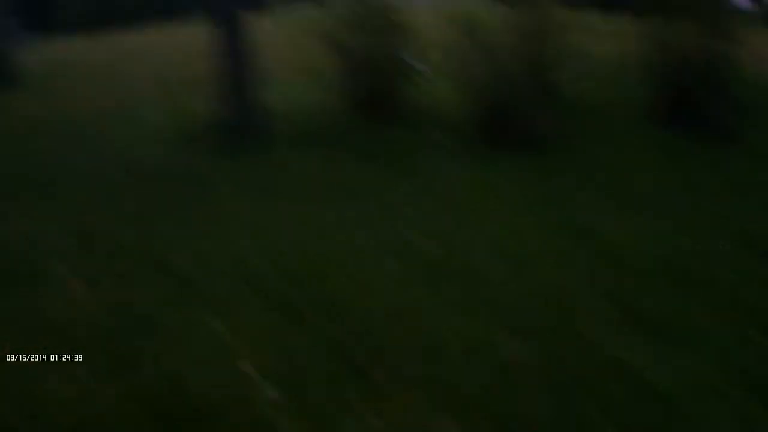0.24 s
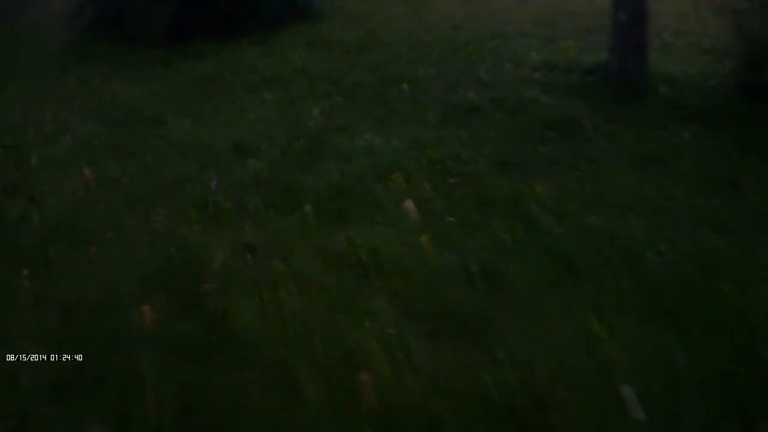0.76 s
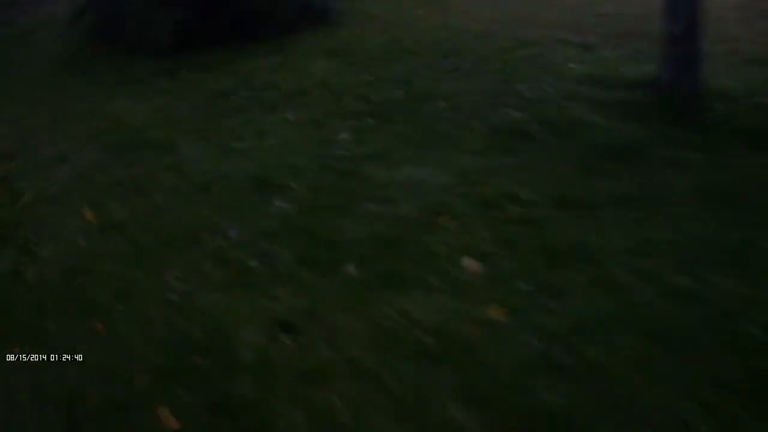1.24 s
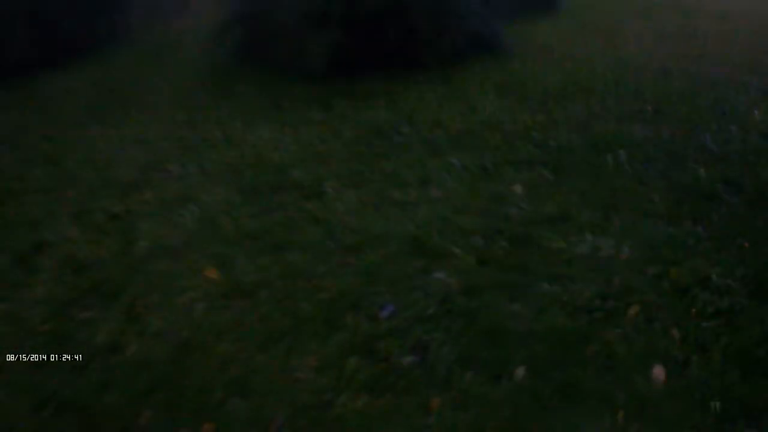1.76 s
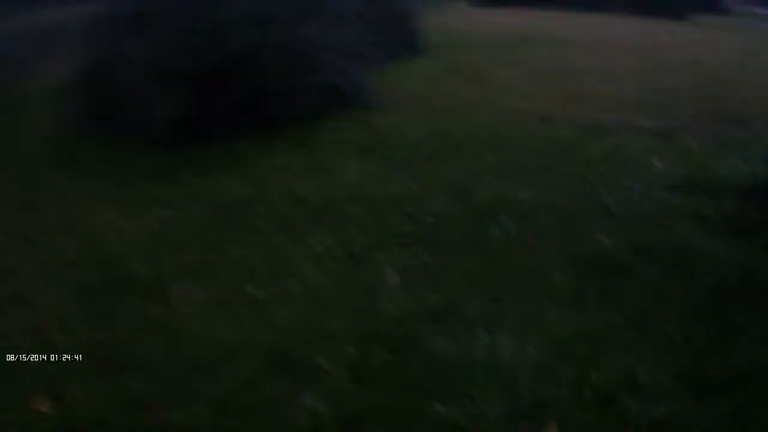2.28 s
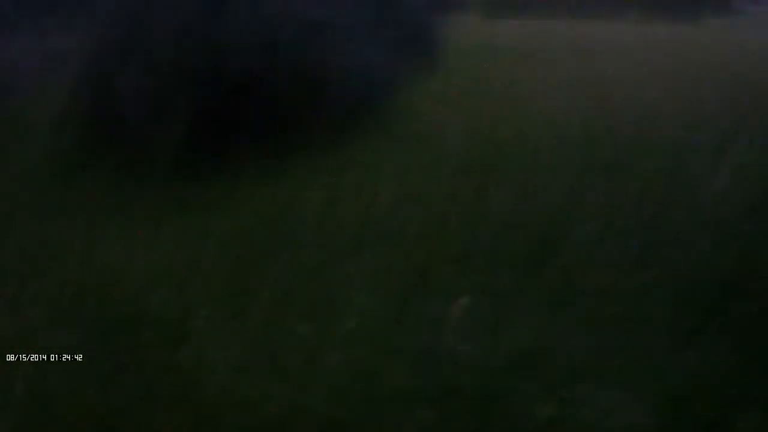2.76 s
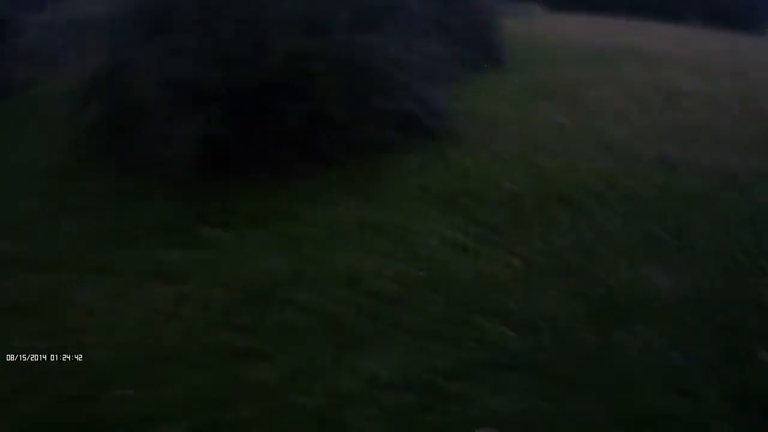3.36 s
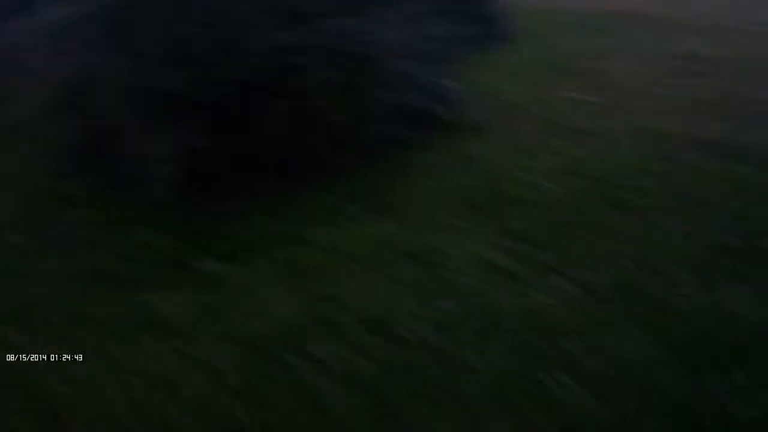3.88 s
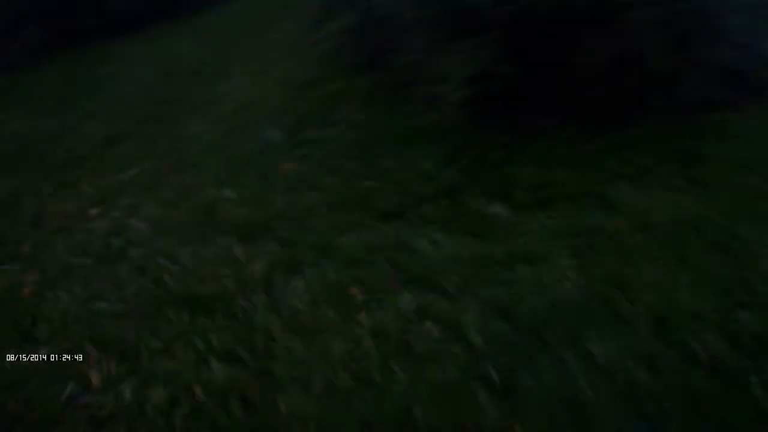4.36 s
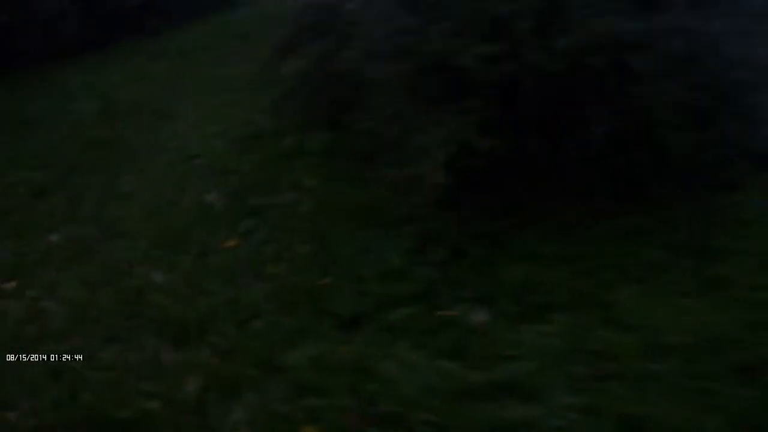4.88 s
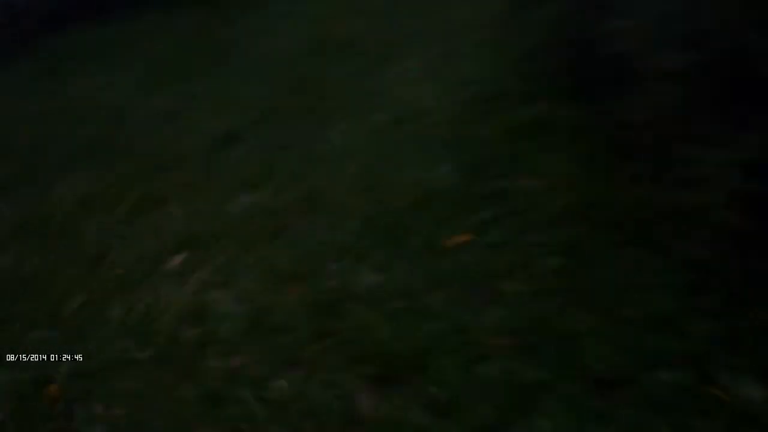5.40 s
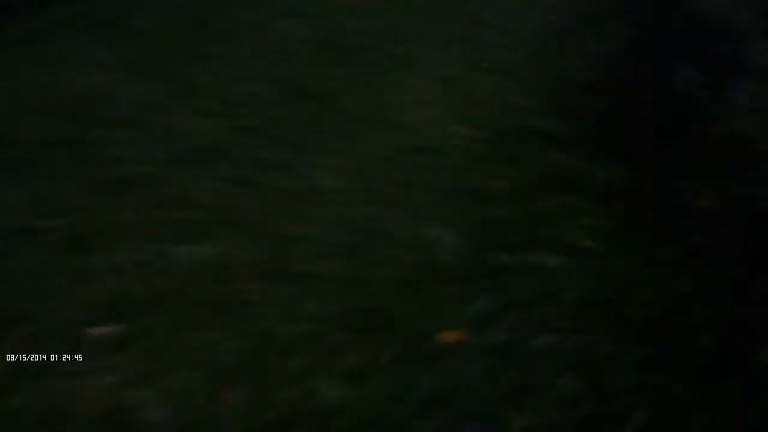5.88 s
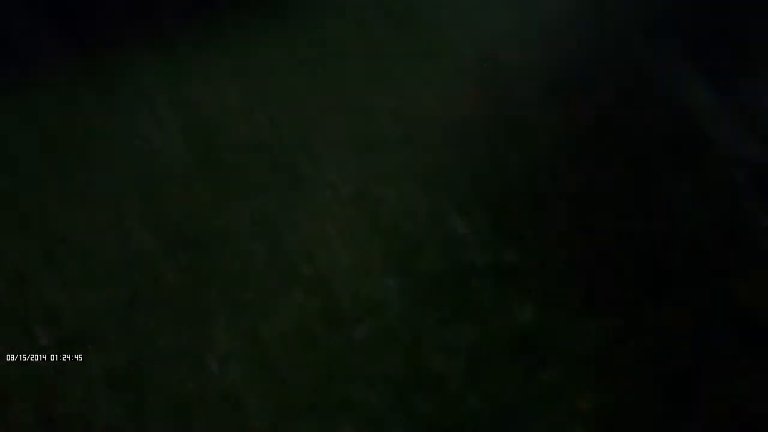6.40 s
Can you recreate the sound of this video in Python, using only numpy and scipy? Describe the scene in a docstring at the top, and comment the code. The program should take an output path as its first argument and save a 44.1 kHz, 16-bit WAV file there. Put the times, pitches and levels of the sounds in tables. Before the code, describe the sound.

Loud, irregular plastic clicks and hollow knocks over dull, regular footfall thumps and faint grassy rustle, heard from inside a closed camera housing.

```python
"""On wet grass, someone walks with a small camera in a closed plastic housing.
Each stride shakes the housing: shaped noise makes low thumps, a slow sway and a muffled rustle.
Loose parts knock and click against it; each blow rings a bank of decaying sine modes.
The housing adds its hollow resonance to the knocks, and a soft microphone hiss lies under everything."""
import sys
import numpy as np
from scipy import signal
from scipy.fft import rfft, irfft
from scipy.io import wavfile
from scipy.ndimage import uniform_filter1d

SR = 44100
rng = np.random.default_rng(int(sys.argv[2]) if len(sys.argv) > 2 else 0)


def generate_wav(sig):
    """Save sig (samples, or channels by samples) to the path in sys.argv[1] as 16-bit PCM at SR."""
    pcm = np.round(np.clip(np.atleast_2d(sig).T, -1, 1) * 32767).astype(np.int16)
    wavfile.write(sys.argv[1], SR, pcm)


N = 292824  # length in samples


def gain_of(db):
    """Turns dB into an amplitude gain."""
    return 10 ** (np.asarray(db) / 20)


def evened(x):
    """Scales to rms 1."""
    return x / np.sqrt(np.mean(x ** 2) + 1e-20)


def add(mix, s, sound):
    """Mixes a sound in at time s, in seconds, cutting it at the end of the mix."""
    part = mix[round(s * SR):][:len(sound)]
    part += sound[:len(part)]


def coloured(x, spectrum):
    """Filters x to the spectrum in minimum phase (sharp attack, ringing after), at rms 1."""
    hz = np.fft.rfftfreq(N, 1 / SR)
    table_hz, table_db = np.transpose(spectrum)
    db = np.interp(np.log(hz + 1), np.log(table_hz + 1), table_db, -90, -90)
    cepstrum = irfft(np.log(gain_of(db)), N)
    # folding the cepstrum onto positive times makes the filter causal
    fold = np.r_[1, 2 * np.ones(N // 2 - 1), 1, np.zeros(N - N // 2 - 1)]
    response = np.exp(rfft(cepstrum * fold))
    return evened(irfft(rfft(x) * response, N))


def steadied(x, span_s, share):
    """Evens out part of the level swings of x that are slower than span_s, at rms 1."""
    span = round(span_s * SR)
    power = uniform_filter1d(uniform_filter1d(x ** 2, span), span)
    return evened(x / (abs(power) + 1e-6) ** (share / 2))


def flutter(per_s, depth_db):
    """A gain that wanders between random levels, per_s of them a second."""
    knots = rng.standard_normal(1400)
    position = np.arange(N) / SR * per_s
    return gain_of(depth_db * np.interp(position, np.arange(len(knots)), knots))


def grains(per_s, spread_db):
    """Sparse impulses of random sign, a few of them large."""
    when = rng.random(N)
    size = rng.exponential(1, N)
    sign = rng.choice([-1., 1.], N)
    return (when < per_s / SR) * sign * gain_of(spread_db * np.minimum(size, 4))


def shaking(blows, shape, dip_db=0):
    """Gain per sample: each blow (s, length s, first dB, last dB) rises, holds and falls over a quiet level."""
    rise_db, fall_db, rest_db = shape
    t = np.arange(0, N, 32) / SR  # one point every 32 samples is enough
    s, length, first_db, last_db = np.transpose(blows)[:, :, None]
    along = np.clip((t - s) / np.maximum(length, 1e-3), 0, 1)
    dip = dip_db * np.sin(np.pi * along) * (length > 0)
    held_db = first_db + (last_db - first_db) * along - dip
    before_s = np.maximum(s - t, 0)
    after_s = np.maximum(t - s - length, 0)
    db = held_db - abs(rise_db) * before_s - abs(fall_db) * after_s
    power = (gain_of(db) ** 2).sum(0) + gain_of(rest_db) ** 2
    return np.interp(np.arange(N) / SR, t, np.sqrt(power))


# Footfalls, heel to toe. Each row: heel in seconds, roll length in seconds, heel thump in dB,
# toe thump in dB, sway at the toe in dB, rustle in dB before the rustle's make-up gain.
FOOTFALLS = [(0.248, 0.084, -36.5, -40, -37, -65), (0.863, 0.064, -28.5, -38, -31.5, -63),
             (1.481, 0.1, -35, -36.5, -35, -65), (2.087, .12, -36.5, -36.5, -28, -62),
             (2.685, 0.093, -37, -33.5, -33.5, -63), (3.237, 0.17, -32.5, -43.5, -33, -63.5),
             (3.905, 0.12, -34.5, -39, -36, -66), (4.528, 0.11, -38, -38, -33.5, -66.5),
             (5.182, .12, -33, -37.5, -32, -62.5), (5.785, 0.064, -28.5, -29, -32.5, -60),
             (6.339, 0.071, -34, -37.5, -30.5, -66.5)]
# Other jolts around the footfalls, with a dragging rustle near 5.4 s. Each row: time in seconds,
# thump in dB, sway in dB, rustle in dB before the rustle's make-up gain.
JOLTS = [(.05, -50, -54, -70.5), (.2, -50, -42, -71), (.46, -47.5, -48, -74), (.67, -50, -32, -64.5),
         (.78, -41.5, -40, -69), (1.109, -47.5, -56, -72.5), (1.29, -44.5, -39, -67.5),
         (1.42, -42.5, -49, -77), (1.67, -46, -45, -71.5), (1.94, -48, -33, -67.5),
         (2.25, -40, -41.5, -66.5), (2.519, -55, -48, -70.5), (2.94, -47, -54, -70.5),
         (3.11, -46, -37, -68), (3.511, -41, -46.5, -74), (3.71, -52, -42.5, -75), (4.1, -53.5, -52, -68.5),
         (4.329, -48, -42.5, -69), (4.44, -42.5, -43, -70), (4.841, -42.5, -40.5, -73),
         (4.98, -44.5, -42, -67), (5.36, -40.5, -43, -61.5), (5.43, -55, -59, -66), (5.5, -58.5, -55, -65),
         (5.592, -37.5, -28, -63.5), (5.68, -52, -47.5, -71), (5.93, -62, -37.5, -69),
         (6.14, -37.5, -34.5, -63), (6.521, -45.5, -49.5, -68)]
# How each layer follows a blow. Each holds: rise in dB per s, fall in dB per s, level between blows in dB
# (the rustle's again before its make-up gain).
THUMP_SHAPE = (350, 240, -55.5)
SWAY_SHAPE = (370, 1000, -54)
RUSTLE_SHAPE = (200, 180, -76)
SWAY_GROWS_DB = 5.5  # the sway builds from heel to toe
ROLL_DIP_DB = 1.5  # the thump sags between heel and toe


def stride():
    """Each footfall rolls from heel to toe and each jolt has no roll; both drive thump, sway and rustle gains."""
    thump, sway, rub = [], [], []
    for s, roll, heel_db, toe_db, sway_db, rustle_db in FOOTFALLS:
        thump.append((s, roll, heel_db, toe_db))
        sway.append((s, roll, sway_db - SWAY_GROWS_DB, sway_db))
        rub.append((s, roll, rustle_db, rustle_db))
    for s, thump_db, sway_db, rustle_db in JOLTS:
        thump.append((s, 0, thump_db, thump_db))
        sway.append((s, 0, sway_db, sway_db))
        rub.append((s, 0, rustle_db, rustle_db))
    thump_gain = shaking(thump, THUMP_SHAPE, ROLL_DIP_DB)
    return thump_gain, shaking(sway, SWAY_SHAPE), shaking(rub, RUSTLE_SHAPE)


# Tone of the microphone hiss. Each row: frequency in Hz, relative density in dB per Hz.
HISS = [(470, -38), (800, -11), (1090, -6.5), (1220, -6.5), (1350, -10), (1730, -17), (2710, -16.5),
        (5940, -18), (14400, -19), (15700, -27)]
HISS_DB = -73  # rms of the hiss before it stirs and flutters


def hiss(rustle_gain):
    """Microphone hiss: coloured noise that flutters at random and rises slightly with the rustle."""
    stir = (rustle_gain / gain_of(-73.5)) ** .09
    level = stir * flutter(45, depth_db=1.4)
    return gain_of(HISS_DB) * level * coloured(rng.standard_normal(N), HISS)


# Muffled tone of the rustle. Each row: frequency in Hz, relative density in dB per Hz.
RUSTLE = [(150, -40.5), (250, -7), (317, -6), (360, -14.5), (413, -12.5), (632, -11), (782, -15.5),
          (1210, -9.5), (1700, -26.5), (2810, -26.5), (3110, -33), (5000, -37.5), (6500, -69.5),
          (11000, -120)]


def rustle(rustle_gain):
    """Grass and clothing through the closed housing: short scuffs and fine crackle over a soft rub of noise."""
    puff = np.exp(-np.arange(800) / SR / .004)  # dies away with a 4 ms time constant
    scuffs = signal.oaconvolve(abs(grains(45, spread_db=3.)), puff)[:N]
    crackle = grains(900, spread_db=2.5) * 2.2
    rub = rng.standard_normal(N) * (.6 + scuffs)
    return gain_of(5.0) * rustle_gain * coloured(crackle + rub, RUSTLE)  # 5 dB make-up gain


# Tone of the thump at the mount's low resonance. Each row: frequency in Hz, relative density in dB per Hz.
THUMP = [(29, -31), (50, -1), (60, 0.5), (86, 3), (97, 2.5), (129, -7), (159, -13.5), (199, -18.5),
         (266, -32), (322, -24), (360, -40), (400, -35.5), (520, -62.5), (880, -120)]
# Tone of the slower camera sway. Each row: frequency in Hz, relative density in dB per Hz.
SWAY = [(8, -14.5), (18, -2), (28, -6), (45, -5), (62, -25.5), (90, -63.5)]


def thumps(thump_gain, sway_gain):
    """Jolts travel up the body and shake the mount near its low resonance; below it the camera sways."""
    shakes = grains(90, spread_db=5.0) + 0.013 * rng.standard_normal(N)
    thump = steadied(coloured(shakes, THUMP), span_s=.03, share=.7)
    sway = steadied(coloured(shakes, SWAY), span_s=.05, share=.7)
    return thump_gain * thump + sway_gain * sway


def ring(modes, weight_db, chatter_ms, push_db):
    """One blow: a briefly chattering contact rings the modes to peak 1, then a push of the housing is added."""
    hz, db, t60 = np.transpose(modes)[:, :, None]
    t = np.arange(2000) / SR
    sign = np.cos(np.pi * np.arange(len(hz)))[:, None]  # neighbouring modes move the microphone oppositely
    level = sign * gain_of(db + weight_db(hz) - 60 * t / t60)
    body = (level * np.sin(2 * np.pi * hz * t)).sum(0)
    fading = np.exp(-(t[:600] * 1000 / max(chatter_ms, .05)) ** 2)
    chatter = gain_of(-27) * rng.standard_normal(600) * fading
    contact = np.r_[1, chatter[1:]]  # the first hit, then the chatter
    build_up = 1 - np.exp(-(t / .0006) ** 2)  # the force builds up smoothly
    blow = np.convolve(contact, body)[:len(t)] * build_up
    u = t / .0004
    push = u ** 2 * (3 - u) * np.exp(-u)  # out and back
    return blow / abs(blow).max() + gain_of(push_db) * push


# A blunter part knocking on the housing wall. Each row: start in seconds, peak of the wall ring in dB,
# corner frequency in Hz, fall below it in dB per octave (negative: rises), fall above it in dB per octave,
# hollow ring in dB relative to that peak.
KNOCKS = [(.078, -45.5, 2420, -0.5, 9.8, -9), (.232, -52, 710, 4, 7.9, -6), (.257, -42.5, 1200, -5, 11, -2),
          (.513, -46.5, 1830, 30, 39, -11), (.854, -36.5, 1570, 5, 20, -9), (.871, -45, 2720, 4.5, 6, -25),
          (.892, -42.5, 2700, 3.5, 8, -24.5), (0.896, -35.5, 2280, 1, 1.9, -26),
          (.903, -42, 2093, 2.5, 8, -24), (1.266, -40, 1040, 21, 36, -18), (1.344, -50.5, 860, 10, 11, -6),
          (1.426, -35.5, 1220, 15, 15, -11), (1.472, -51.5, 2200, -3, 4.5, -17),
          (1.504, -46.5, 2486, 16, 21, -18), (1.5594, -13, 2410, -3, 2.6, -25.5),
          (1.66, -45.5, 1454, -3.5, 7.6, -19), (2.045, -15, 1213, 13, 6.4, -27.5),
          (2.277, -38, 4050, 43.5, 37, -27), (2.279, -43, 707, 4.5, 20, -25),
          (2.6644, -9.5, 2650, 2.5, 8, -30.5), (2.763, -25, 915, 21, 19, -5.5),
          (3.218, -24.5, 1370, 5.5, 12, -27.5), (3.232, -32, 920, 25, 17, -30),
          (3.299, -31, 923, 16.5, 16.4, -13), (3.565, -50, 2540, 0, 3.7, -30),
          (3.68, -40, 1300, 5, 15.6, -21), (3.853, -39.5, 1130, 13.5, 27, -12.5),
          (3.909, -46.5, 900, 1.5, 7.9, -12.5), (3.924, -40.5, 1190, 18, 25, -8),
          (3.967, -28, 1144, 5, 25.6, -4), (4.099, -56.5, 794, 3, 8.7, 1.5), (4.165, -51, 700, 3, 15, -1),
          (4.201, -48, 704, 0, 12, -3.5), (4.266, -51.5, 713, -6, 11, -0.5),
          (4.403, -51, 2840, 12.5, 12, -30), (4.412, -38.5, 1100, 18, 22, -14),
          (4.608, -27.5, 1220, 11, 19, -12), (5.049, -47, 806, 8, 14, -7), (5.164, -49.5, 1200, 0, 16, -19),
          (5.338, -44.5, 1200, -2, 15, -7), (5.459, -48, 1100, 1.5, 8.5, -30),
          (5.528, -48.5, 900, 4, 15, -22), (5.619, -46.5, 950, 3, 18, -25), (5.642, -45, 906, 3.5, 23, -5),
          (5.721, -47, 800, 4.5, 11, -12), (5.765, -33.5, 1353, 10, 20, -12),
          (6.128, -49, 900, -8, 15, -8.5), (6.2072, -34.5, 1850, 35.5, 6, -30.5),
          (6.432, -44.5, 708, 4, 12, -9.5), (6.515, -41, 998, -1, 12.5, -7.5)]
# Wall modes that a knock rings. Each row: frequency in Hz, level in dB before weighting, t60 in seconds.
KNOCK_MODES = [(722, -4, .032), (980, -8, .010), (1230, -4, .018), (1550, -5, .011), (1850, -6, .021),
               (2120, -6, .018), (2415, -4, .022), (2700, -3, .019), (3050, -6, .014), (3440, -7, .015),
               (3750, -7, .016), (4150, -11, .016), (4590, -11, .011), (5040, -14, .012), (5800, -20, .008),
               (6780, -16, .014), (8450, -24, .009)]
# Lowest ring of the housing. It holds: frequency in Hz, t60 in seconds.
HOLLOW = (323, .105)


def knocks():
    """Blunt contacts ring the wall modes, tilted about a corner frequency, and the hollow of the housing."""
    out = np.zeros(N)
    t = np.arange(8000) / SR
    hollow_hz, hollow_t60 = HOLLOW
    swell = 1 - np.exp(-(t / 0.0018) ** 2)
    hollow = gain_of(-60 * t / hollow_t60) * np.sin(2 * np.pi * hollow_hz * t) * swell
    for s, peak_db, corner_hz, below_db, above_db, hollow_db in KNOCKS:
        def weight_db(hz):
            """Tilts the modes separately below and above the corner frequency."""
            octaves = np.log2(hz / corner_hz)
            return np.where(octaves < 0, below_db, -above_db) * octaves
        blow = ring(KNOCK_MODES, weight_db, chatter_ms=5.3, push_db=-15.0)
        add(out, s, gain_of(peak_db) * blow)
        add(out, s, gain_of(peak_db + hollow_db) * hollow)
    return out


# A small hard part striking close to the microphone. Each row: start in seconds, peak of the ring in dB,
# tilt in dB per octave around 4 kHz, chatter time in ms.
CLICKS = [(0.6776, -46, -11, 2.6), (0.8645, -27.5, -7.5, 6.6), (0.8796, -38, -5.5, 1.2),
          (0.9285, -2, -1.5, 1.06), (0.9352, -11, -4, 3.4), (1.3236, -51, -12, 1.3),
          (2.1379, -40.5, 5, 2.3), (2.142, -34.5, -8.5, 1.7), (2.148, -38, -10.5, 1.2),
          (2.1912, -4.5, -3, 1.8), (2.7322, -21, -6.5, 4.1), (2.738, -25.5, -3, 1.2),
          (2.771, -19, -7.5, 5.3), (3.3415, -24, -4.5, 2.1), (3.3937, -4, -2, 3.2),
          (3.4007, -15.5, -2.5, 1.5), (4.9655, -51.5, -4, 1.2), (5.331, -55.5, -1.5, 2),
          (5.8255, -30, -12.5, 2.1), (5.864, -2.5, -2.5, 3.04), (5.8754, -17, -5.5, 0.98),
          (6.3225, -5.5, -4, 4), (6.3284, -18, -5.5, 1.1)]
# Modes that a click rings. Each row: frequency in Hz, level in dB before the tilt, t60 in seconds.
CLICK_MODES = [(714, -20, 0.0052), (1631.4, -30, 0.015), (2074, -21.5, 0.0087), (2786, -14, 0.016),
               (3330, -9.5, 0.019), (3606, -7.5, 0.01), (4210, -19, .008), (4885, 4, 0.0059),
               (5710, -18.5, 0.014), (6410, -19, 0.0083), (7130, -22.5, 0.007), (8140, -16.5, 0.0045),
               (9200, -28, 0.0029), (10533, -23, 0.0075), (11500, -27.5, 0.001), (13000, -23, .003),
               (15040, -27, .003)]


def clicks():
    """Hard, short contacts ring the high modes, brighter or duller by their tilt."""
    out = np.zeros(N)
    for s, peak_db, tilt_db, chatter_ms in CLICKS:
        def weight_db(hz):
            """Tilts the modes around 4 kHz."""
            return tilt_db * np.log2(hz / 4000)
        blow = ring(CLICK_MODES, weight_db, chatter_ms, push_db=-20)
        add(out, s, gain_of(peak_db) * blow)
    return out


def scene():
    """All sources reach one microphone through the housing and add up in one channel."""
    thump_gain, sway_gain, rustle_gain = stride()
    background = hiss(rustle_gain) + rustle(rustle_gain)
    blows = thumps(thump_gain, sway_gain) + knocks() + clicks()
    return (background + blows)[None]


def record(dry):
    """The capsule rounds off loud peaks and bends them to one side; then the recorder limits the band."""
    soft = np.tanh(1.5 * dry) / 1.5
    bent = soft + .5 * soft ** 2
    low_pass = signal.firwin(511, 16500, window=("kaiser", 9), fs=SR)  # edge at 16.5 kHz
    return signal.oaconvolve(bent, low_pass[None], "same")


dry = scene()
out = record(dry)
generate_wav(out)
```